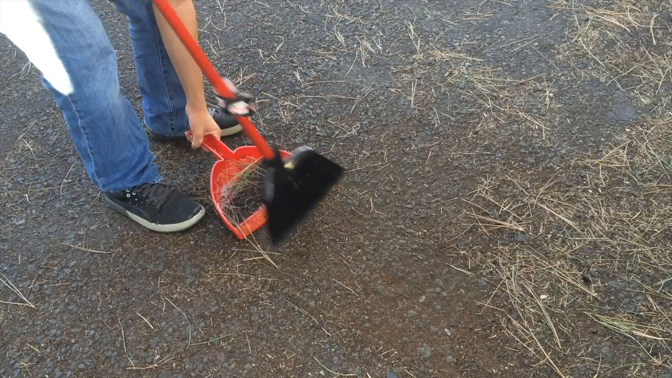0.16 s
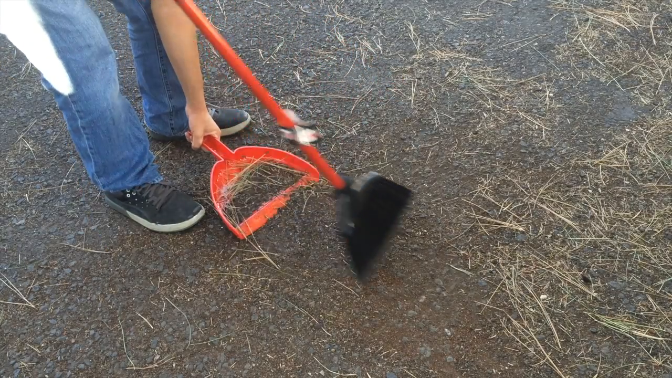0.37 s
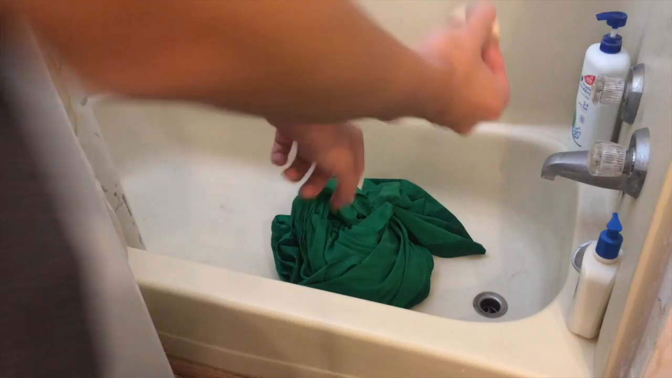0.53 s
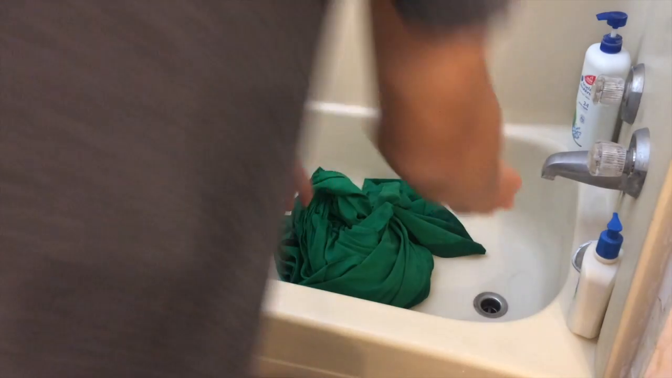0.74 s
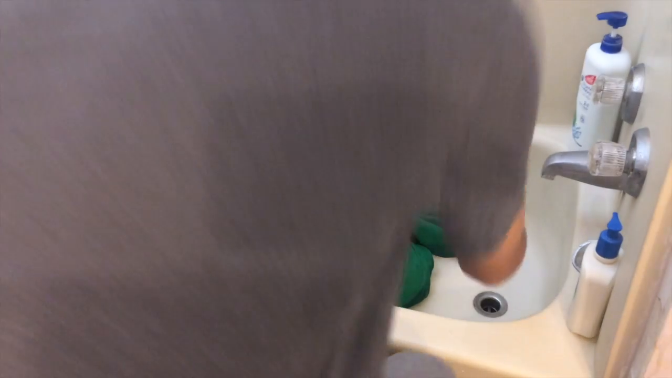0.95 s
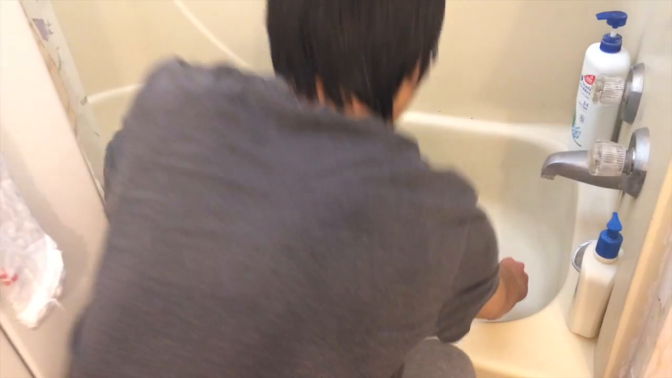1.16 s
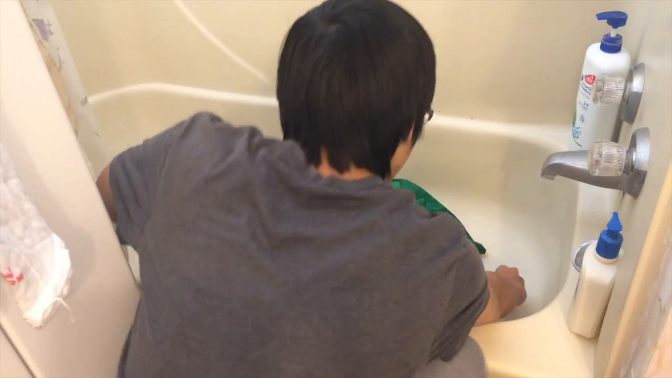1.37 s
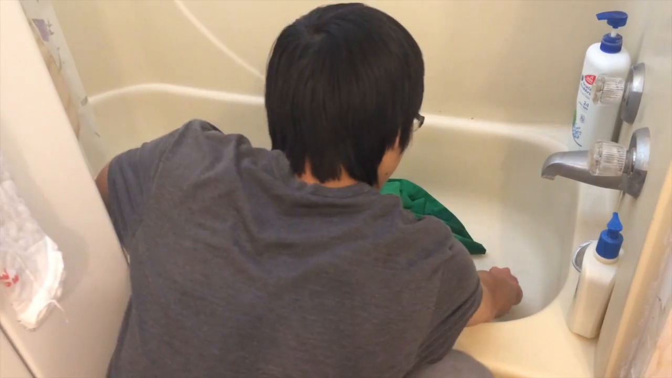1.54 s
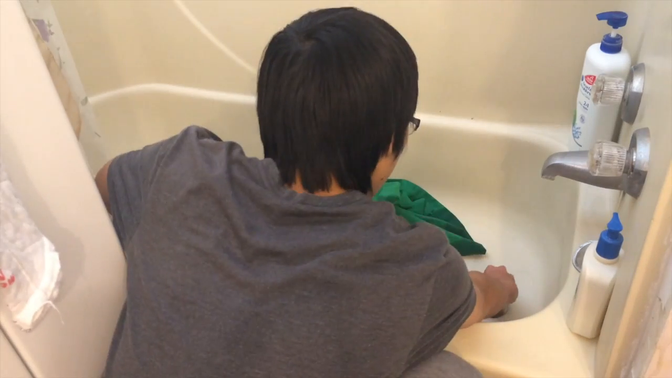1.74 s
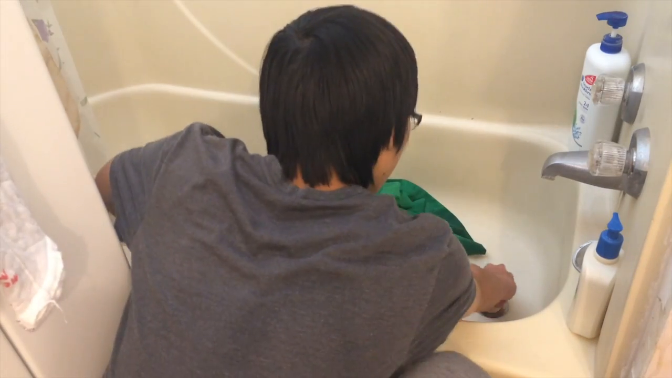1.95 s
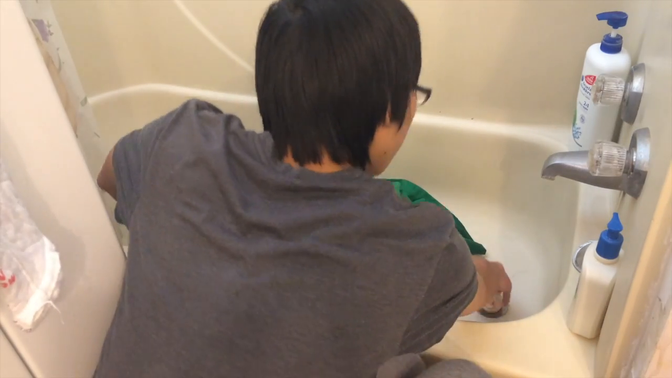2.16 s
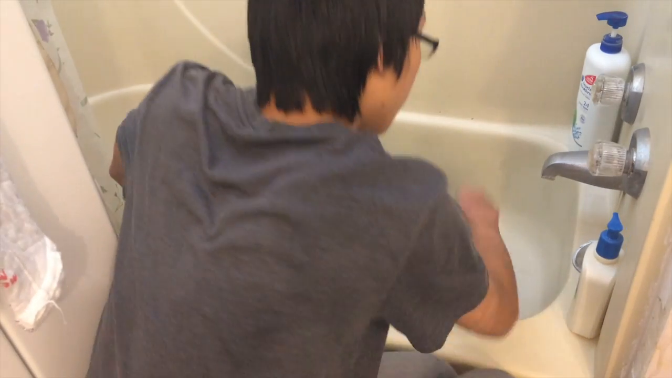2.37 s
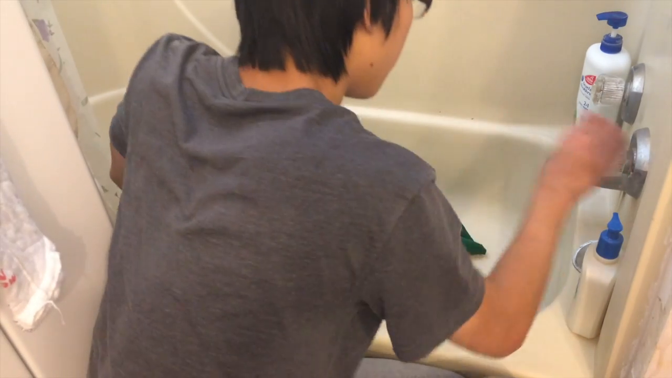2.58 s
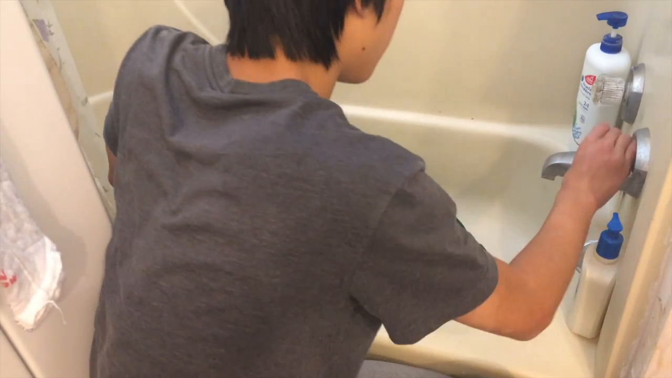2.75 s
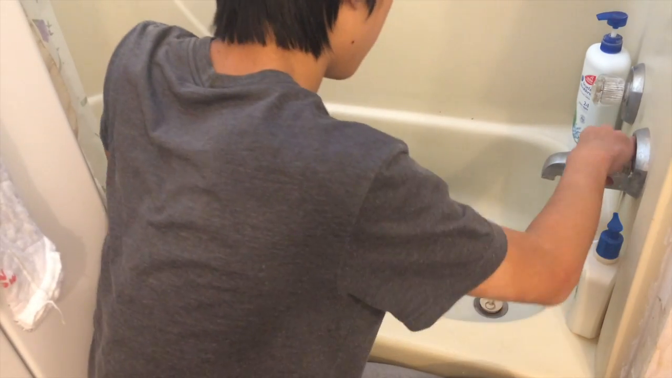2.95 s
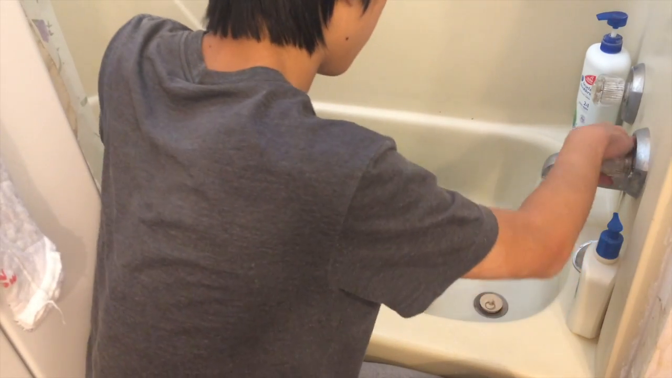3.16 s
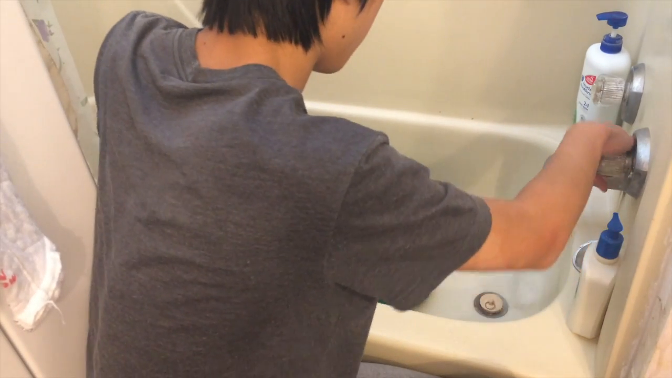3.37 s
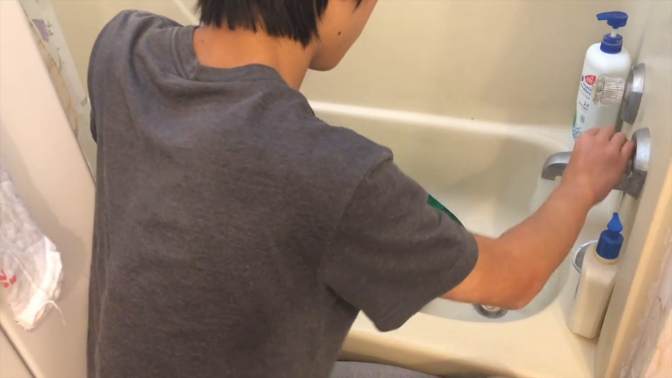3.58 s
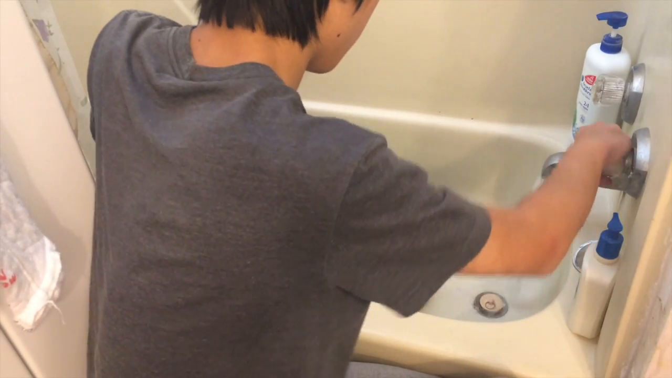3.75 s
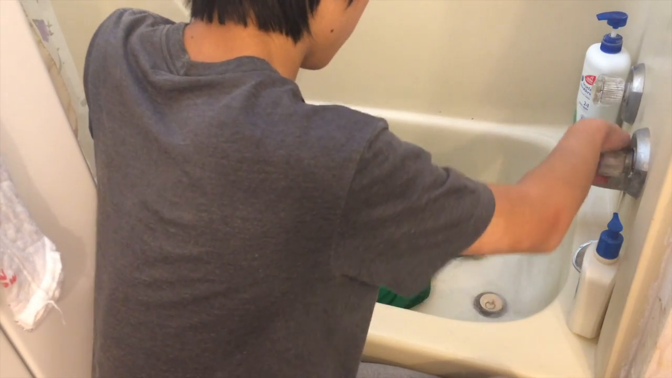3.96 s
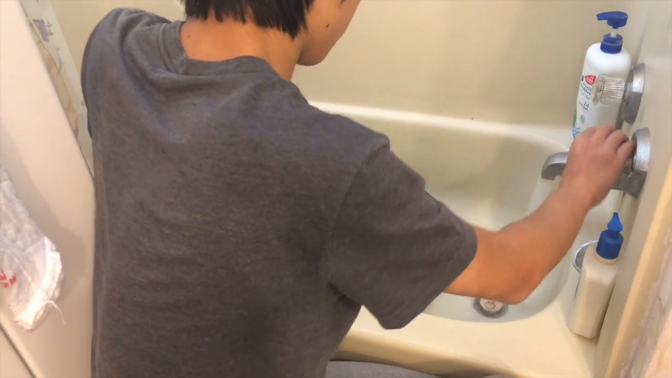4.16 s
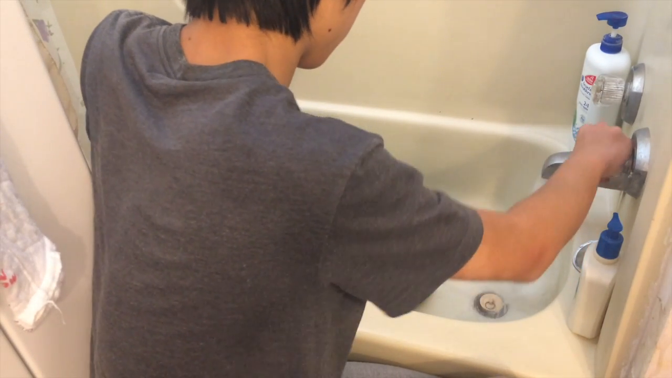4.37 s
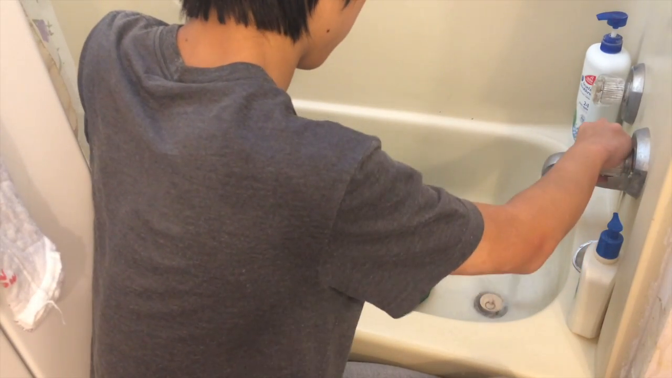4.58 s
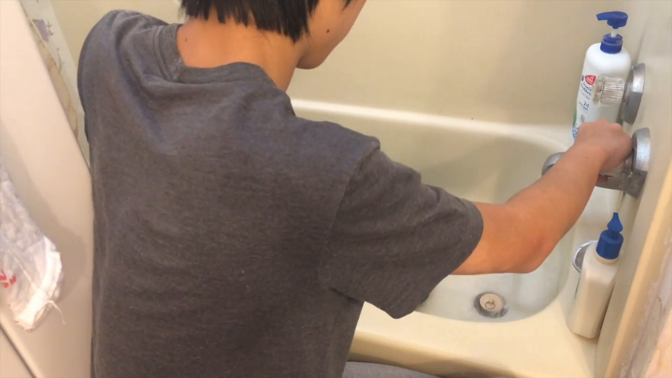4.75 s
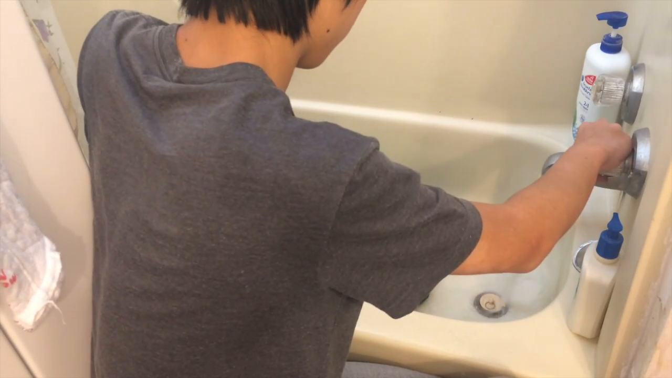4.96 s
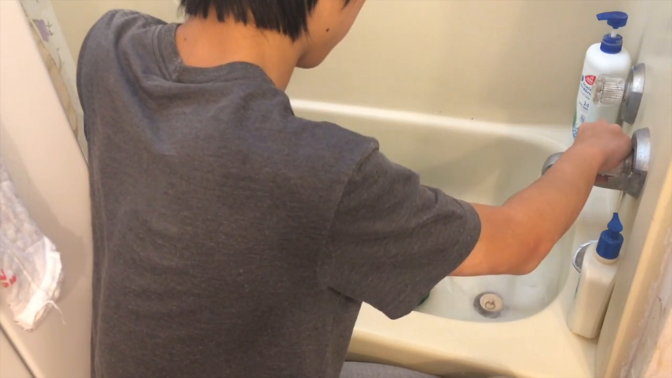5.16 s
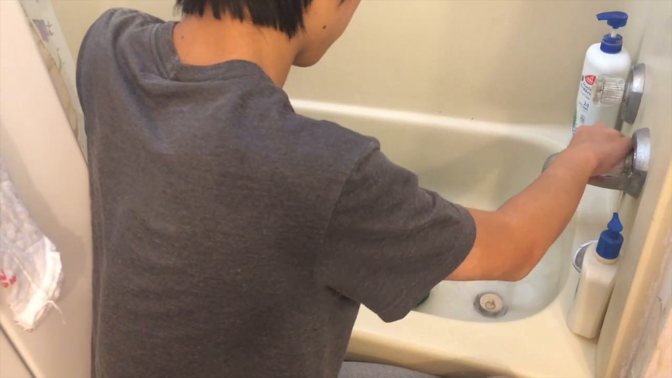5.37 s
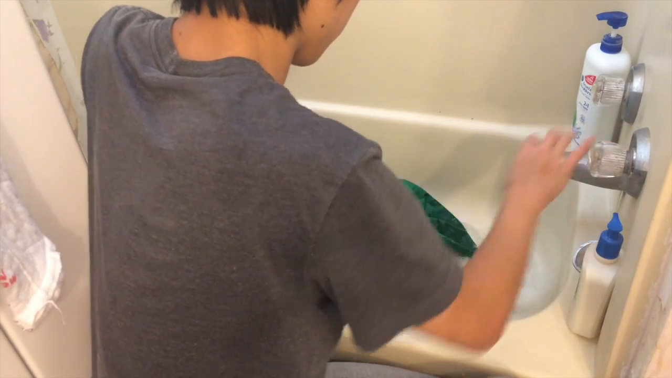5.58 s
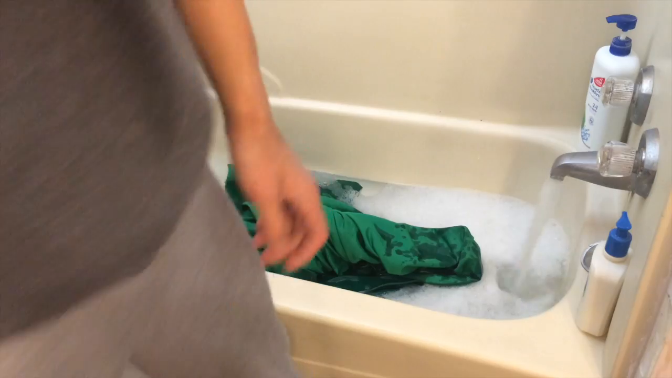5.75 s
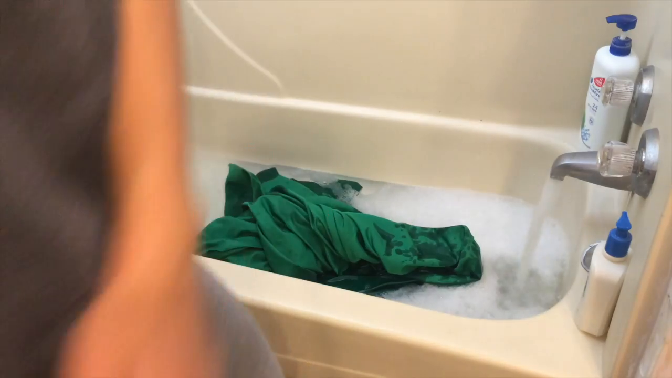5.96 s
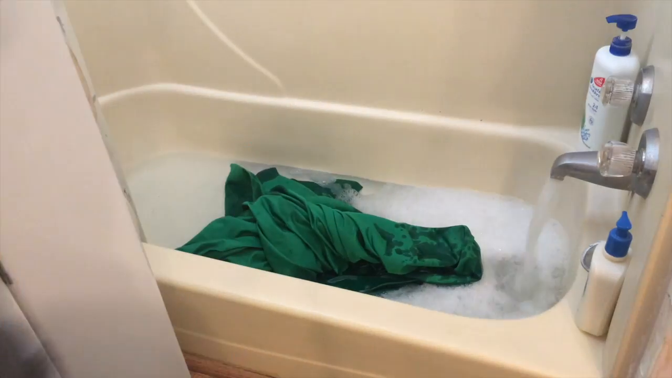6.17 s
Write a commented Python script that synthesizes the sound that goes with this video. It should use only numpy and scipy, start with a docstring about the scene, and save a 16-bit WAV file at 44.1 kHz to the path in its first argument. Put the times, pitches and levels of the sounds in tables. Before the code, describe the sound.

After a quick sweep into a dustpan, clothes rustle, a drain plug clacks, and a bath faucet opens with a whine and runs.

```python
"""A yard, traffic far off: a broom scrapes grit into a dustpan. Then, abruptly, a small bathroom.
Someone leans into the tub, bumps its shell, seats the drain plug with a clack and opens the faucet.
The valve hisses and whines while half open, the spout gulps, and the jet splashes and drums on the tub.
After another abrupt change the jet runs softly into foam. One microphone, mono throughout."""
import sys
import numpy as np
from scipy import signal
from scipy.fft import rfft, irfft
from scipy.io import wavfile
from scipy.ndimage import uniform_filter1d

SR = 44100
rng = np.random.default_rng(int(sys.argv[2]) if len(sys.argv) > 2 else 0)


def inscribe(sig):
    """Save sig as 16-bit PCM at rate SR to the path in sys.argv[1].

    A 1-D sig is mono; a 2-D sig holds one channel per row.
    Samples are clipped to [-1, 1] before scaling.
    """
    pcm = np.round(np.clip(np.atleast_2d(sig).T, -1, 1) * 32767)
    wavfile.write(sys.argv[1], SR, pcm.astype(np.int16))


N = 274302
T = np.arange(N) / SR

# Distant traffic, heard from the yard. Each row: frequency in Hz, level in dB.
TRAFFIC_SPECTRUM = [(18, -48), (30, -22), (105, -1), (228, -19), (328, -15.5), (364, -24), (426, -17),
                    (497, -21), (978, -22), (1560, -30.5), (2370, -42), (2920, -43), (3150, -42),
                    (15000, -54)]
# Bristles on asphalt. Each row: frequency in Hz, level in dB.
BRISTLE_SPECTRUM = [(300, 1), (1500, 3.5), (3500, -6), (7000, -11), (14000, -27)]
# Pushes of the broom. Each row: peak time in seconds, level in dB, rise and decay in seconds.
BROOM_STROKES = [(.03, -52.5, 0.055, 0.073), (.11, -53.5, .04, .02), (.195, -57, .015, 0.014)]
# Grit and broom head on the pan. Each row: start in seconds, level in dB, pitch in Hz, decay in seconds.
DUSTPAN_TICKS = [(.01, -51, 7000, 0.0022), (.031, -36.5, 1430, 0.0063), (.033, -43, 5960, 0.0054),
                 (.065, -50, 3400, .002), (.083, -40.5, 3550, 0.0022), (.112, -49, 3000, .002),
                 (.185, -41, 2030, 0.0036), (.186, -48, 7650, .002)]
# Bathroom room tone. Each row: frequency in Hz, level in dB.
ROOM_SPECTRUM = [(15, -35), (25, -12), (54, -0.5), (95, -7.5), (128, -2), (250, -6.5), (655, -16.5),
                 (769, -16.5), (1060, -21.5), (1310, -19.5), (1960, -24.5), (2930, -25), (15000, -37)]
# Rustling clothes. Each row: frequency in Hz, level in dB.
CLOTH_SPECTRUM = [(150, 4), (450, 5.5), (900, 0), (1300, 0), (2200, -6), (3500, -13), (6000, -15),
                  (8000, -18), (11000, -27.5), (15000, -35)]
# Moves of the body. Each row: peak time in seconds, level in dB, rise and decay in seconds.
BODY_MOVES = [(.487, -48.5, .01, 0.13), (.63, -55.5, 0.078, 0.08), (1.06, -58, 0.21, 0.27),
              (1.46, -55, .03, 0.21), (1.67, -52, .015, 0.1), (2.76, -59, 0.35, 0.33)]
# Hands and knees on the tub. Each row: start in seconds, level in dB, pitch in Hz, decay in seconds,
# scuff level in dB relative to the bump.
TUB_BUMPS = [(1.008, -35.5, 51.6, 0.04, -4), (1.192, -41, 176, 0.012, -23), (1.246, -45.5, 183, 0.033, -26),
             (1.42, -32.5, 354, 0.025, -12.5), (1.46, -32.5, 153.5, 0.037, -27),
             (1.514, -35.5, 74.4, 0.02, -3), (1.642, -32.5, 300, 0.014, -11),
             (1.656, -28, 221.6, 0.027, -19), (1.68, -32.5, 185, 0.042, -14),
             (1.756, -36.5, 185, 0.041, -32), (2.227, -46.5, 189, 0.01, -6),
             (2.722, -39.5, 160.5, 0.046, -30), (2.74, -39, 422, 0.021, -5)]
# The plug drops into its seat. Each row: start in seconds, level in dB.
PLUG_CLACKS = [(1.5171, -10.8), (1.532, -23)]
# The plug's ring. Each row: frequency in Hz, level in dB, seconds to fall 60 dB.
PLUG_MODES = [(810, -6, 0.099), (1094, -22, 0.081), (1260, -9, 0.063), (1437, 3, 0.17), (1580, 1, 0.069),
              (1820, -3, 0.1), (2050, -2, 0.06), (2500, -12, .06), (3000, -20, 0.063), (3540, -6, 0.043)]
# The clack thrown back by the tub walls. Each row: frequency in Hz, level in dB.
CLACK_ECHO_SPECTRUM = [(200, -16), (600, -16), (800, -11), (1400, 0), (2000, 0.5), (2800, -22), (3500, -23),
                       (4500, -26), (6000, -41), (9000, -49), (15000, -69)]
# The jet through the half-open valve. Each row: frequency in Hz, level in dB.
HISS_SPECTRUM = [(250, -1.5), (450, 4.5), (700, 7.5), (950, 4.5), (1200, 1.5), (1700, 0), (2200, -1.5),
                 (3500, -6), (4800, -1.5), (6500, 3), (8000, 0.5), (9500, -4.5), (13000, -12), (15000, -19)]
# The hollow spout's resonances. Each row: frequency in Hz, width in Hz, level in dB.
SPOUT_MODES = [(2425, 80, 0.5), (3000, 120, 1.5), (3350, 160, 0.5), (3690, 110, 0.5), (4140, 64, 2.5),
               (4650, 79, -9), (5080, 170, -11), (5950, 120, 1), (6410, 49, 0), (6620, 12, 4),
               (7210, 110, 0), (7610, 80, 3), (7600, 57, -8), (7830, 120, 2), (8570, 93, 0)]
# The pipe's resonances. Each row: frequency in Hz, width in Hz, level in dB.
PIPE_MODES = [(1104, 11, -16.5), (1275, 21, -33), (1610, 20, -12), (1732, 45, -5.5), (1830, 27, -15),
              (1937, 16, -10.5)]
# The whine flares up. Each row: peak time in seconds, level in dB, pitch in Hz, length in seconds.
WHINE_FLARES = [(3.075, -28.5, 1434, .05), (3.285, -20, 1420, .022), (3.414, -15.5, 1437, .014),
                (3.478, -18, 1474, .018), (3.522, -18, 1557, 0.015), (3.684, -14.5, 1450, .011),
                (3.697, -15, 1488, .018), (3.753, -13.5, 1530, 0.017)]
# The tub shell's resonances. Each row: frequency in Hz, width in Hz, level in dB.
TUB_MODES = [(69.4, 25, -18), (101.5, 6.3, -10), (162, 19, -1), (185, 31, -1.5), (310.7, 11.7, -2),
             (438, 28, -2.5), (449, 22, -11), (674, 21, -1.5), (975, 32, -6), (1930, 14, -3.5),
             (2303, 30, -3.5)]
# Air in the filling spout. Each row: start in seconds, level in dB, pitch in Hz, fall in Hz per second,
# rise and decay in seconds.
SPOUT_GULPS = [(2.963, -18.5, 567, 900, 0.0023, 0.0033), (2.975, -36.5, 593, 1504, 0.0041, 0.067),
               (3.045, -25.5, 482.6, 250, .0091, 0.034), (3.067, -33, 327, 100.6, .0071, 0.022),
               (3.199, -34.5, 458.4, 100, 0.014, 0.044), (3.679, -33, 458, 100, .0075, 0.021)]
# The jet on the bare tub. Each row: frequency in Hz, level in dB.
SPLASH_SPECTRUM = [(30, -36), (60, -13), (100, -2.5), (125, -8), (165, 5.5), (265, -17), (330, -7),
                   (600, -4), (850, -8), (1200, -7), (1600, -2), (3000, -4.5), (4400, -5.5), (6300, -5.5),
                   (8000, -8.5), (10000, -14.5), (13000, -19), (15000, -27)]
# Larger splashes in the new pool. Each row: start in seconds, level in dB, pitch in Hz, decay in seconds.
POOL_SLAPS = [(3.325, -27.5, 2530, 0.015), (3.752, -26.5, 2880, 0.033), (3.805, -25.5, 2200, 0.011),
              (3.903, -28.5, 1940, 0.022), (3.951, -26, 2434, 0.0076), (4.033, -23, 2200, 0.01),
              (4.122, -23.5, 2470, 0.021), (4.325, -26.5, 1910, 0.014), (4.608, -27.5, 1930, 0.0087),
              (4.89, -29, 1730, 0.013), (5.7, -27, 1900, 0.0073)]
# The jet spurts. Each row: peak time in seconds, level in dB, rise and decay in seconds.
JET_SPURTS = [(3.965, -31.5, 0.022, 0.039), (4.055, -34, 0.02, 0.12)]
# The jet running into suds. Each row: frequency in Hz, level in dB.
FOAM_SPECTRUM = [(30, -19), (70, -8), (105, 8), (128, -3), (180, 9), (260, -5), (700, -6), (1150, -11),
                 (1400, -2.5), (1700, -4), (2100, -10), (4500, -15.5), (8000, -21.5), (12000, -28),
                 (15000, -40)]
# Spatters on the foam. Each row: start in seconds, level in dB, pitch in Hz, decay in seconds.
FOAM_SPATTERS = [(5.885, -44, 4500, 0.02), (5.968, -59, 7500, .002), (6.0, -44, 3480, 0.055),
                 (6.037, -44, 5500, .018), (6.111, -44, 7470, .002), (6.203, -49, 7500, 0.0043)]

INDOORS_S, FOAM_S = 0.491, 5.787  # the two changes of scene
FLOW_START_S, FLOW_RISE_S, JET_LANDS_S, WIDE_OPEN_S = 2.886, 0.044, 3.312, 3.715
FAINT_START_S, WHINE_START_S, WHINE_END_S = 2.87, 2.99, 3.71  # at the end the gap is too wide to whistle
WHINE_DB, WHINE_GROWTH_DB_PER_S, WHINE_FALL_DB_PER_S = -30.5, 10.5, 145
WHINE_HZ, SAG_HZ_PER_S, CLIMB_HZ_PER_S = 1396, 1150, 168
HISS_DB, SPLASH_DB, DRUM_DB, DRIBBLE_DB, FOAM_DB = -34, -34, -43, -51, -48
TREBLE_LIMIT_HZ = 15300


def amp(db):
    """Decibels to gain."""
    return 10 ** (np.asarray(db) / 20)


def unit(x):
    """Scaled to rms 1."""
    return x / np.sqrt(np.mean(x ** 2) + 1e-20)


def peaked(x):
    """Scaled to peak 1."""
    return x / abs(x).max()


def add(mix, start, sound):
    """Mixes a sound in at start seconds."""
    part = mix[max(round(start * SR), 0):][:len(sound)]
    part += sound[:len(part)]


def colour(x, points):
    """Shapes x by a spectrum of (Hz, dB) points, at rms 1."""
    hz, db = np.transpose(points)
    f = np.fft.rfftfreq(len(x), 1 / SR) + 1
    gain = amp(np.interp(np.log(f), np.log(hz), db)) * np.minimum(f / hz[0], 1) ** 2
    return unit(irfft(rfft(x) * gain, len(x)))


def noise(size=N):
    """White noise."""
    return rng.standard_normal(size)


def wander(rate):
    """Random drift of rms 1, up to about rate changes a second."""
    return unit(irfft(rfft(noise()) * np.exp(-(np.fft.rfftfreq(N, 1 / SR) / rate) ** 2), N))


def envelope(start, rise, end=np.inf, fall_db_per_s=0):
    """Rises towards 1 from start, then falls after end."""
    attack = (1 - np.exp(-np.maximum(T - start, 0) / rise)) ** 2
    return attack * amp(-fall_db_per_s * np.maximum(T - end, 0))


def swells(rows):
    """Gain of overlapping gestures, each rising to its peak and dying away."""
    return np.sqrt(sum((amp(db) * np.exp(-np.maximum((peak - T) / rise, (T - peak) / decay))) ** 2
                       for peak, db, rise, decay in rows))


def resonate(x, hz, width):
    """A steady or moving resonance of gain 1."""
    turn = np.exp(2j * np.pi * np.cumsum(hz * np.ones(len(x))) / SR)
    pole = np.exp(-np.pi * width / SR)
    return 2 * (turn * signal.lfilter([1 - pole], [1, -pole], x / turn + 1e-18)).real


def ring_modes(drive, modes, skirt):
    """Rings each mode with a fresh drive(); a second resonance, skirt times wider, trims its sides."""
    return sum(amp(db) * unit(resonate(resonate(drive(), hz, width), hz, skirt * width))
               for hz, width, db in modes)


def band(x, hz, spread):
    """Band-pass from hz / spread to hz * spread."""
    edges = [hz / spread, min(hz * spread, SR / 2 - 1)]
    return signal.sosfilt(signal.butter(2, edges, "band", fs=SR, output="sos"), x)


def patchy(x, depth_db):
    """Lets patches of the spectrum swell and fade independently."""
    spectra = signal.stft(x, nperseg=512)[2]
    patches = uniform_filter1d(noise(spectra.shape), size=12, axis=0)
    patches = unit(uniform_filter1d(patches, size=8, axis=1))
    return signal.istft(spectra * amp(depth_db * patches), nperseg=512)[1][:N]


def room(x, wet_db, t60):
    """The direct sound at the microphone, plus dense reflections from close, hard walls."""
    t = T[:SR // 2]
    taps = noise(len(t)) * (rng.random(len(t)) < .15) * (t > .002) * amp(-60 * t / t60)
    return x + amp(wet_db) * signal.oaconvolve(x, taps / np.linalg.norm(taps))[:N]


def burst(hz, decay, spread):
    """A dying burst of noise around one frequency."""
    t = T[:SR // 3]
    return peaked(band(noise(len(t)) * np.exp(-t / decay), hz, spread))


def ticks(rows, spread):
    """One short burst for each row."""
    out = np.zeros(N)
    for start, db, hz, decay in rows:
        add(out, start, amp(db) * burst(hz, decay, spread))
    return out


def drops(per_s, spread_db):
    """Random impacts, most small and a few large."""
    return noise() * (rng.random(N) < per_s / SR) * amp(spread_db * np.minimum(rng.exponential(1, N), 4))


def bubbles(per_s, low_hz, high_hz, cycles, count=30):
    """Trapped bubbles ring for some cycles, rising in pitch as they surface."""
    out, t = np.zeros(N), T[:SR // 12]
    for hz in np.geomspace(low_hz, high_hz, count):
        age = t * hz / cycles
        ring = np.exp(-age) * np.sin(2 * np.pi * hz * t * (1 + 0.0273 * age))
        births = (rng.random(N) < per_s / count / SR) * rng.uniform(-0.93, 1, N) ** 3
        out += signal.oaconvolve(births, ring)[:N] * np.sqrt(hz)
    return unit(out)


def traffic():
    """Traffic rumbles far from the microphone."""
    return amp(-49) * colour(noise(), TRAFFIC_SPECTRUM)


def broom():
    """In the open air, bristles scrape asphalt and push ticking grit into the pan."""
    sweep = swells(BROOM_STROKES) * colour(drops(2500, 3.3), BRISTLE_SPECTRUM)
    return sweep + ticks(DUSTPAN_TICKS, spread=1.32)


def room_tone():
    """The bathroom's faint, low background."""
    return amp(-59) * colour(noise(), ROOM_SPECTRUM)


def leaning_in():
    """Cloth rustles and soft bumps set the tub shell thudding; their scuffs echo off the near walls."""
    thuds, scuffs, t = np.zeros(N), np.zeros(N), T[:SR // 3]
    for start, db, hz, decay, scuff_db in TUB_BUMPS:
        thud = peaked(np.sin(2 * np.pi * hz * t) * (1 - np.exp(-t / 0.0011)) * np.exp(-t / decay))
        add(thuds, start, amp(db) * (0.47 * thud + 0.68 * burst(hz, decay, spread=1.55)))
        scuff = peaked(colour(noise(len(t)), CLOTH_SPECTRUM) * np.exp(-t / 0.018))
        add(scuffs, start, amp(db + scuff_db) * scuff)
    cloth = swells(BODY_MOVES) * colour(drops(20000, 0.59), CLOTH_SPECTRUM)
    return thuds + room(scuffs, wet_db=-4.5, t60=0.18) + cloth


def drain_plug():
    """A sharp contact pulse, then the plug's ring and the tub's dense reflections."""
    out, t = np.zeros(N), T[:SR // 3]
    pulse = band(1. * (t == 0), hz=1460, spread=1.9)
    contact = peaked(signal.sosfilt(signal.butter(2, [1100, 2200], "band", fs=SR, output="sos"), pulse))
    ring = peaked(sum(amp(db - 60 * t / t60) * np.sin(2 * np.pi * (hz * t + rng.random()))
                      for hz, db, t60 in PLUG_MODES))
    for start, db in PLUG_CLACKS:
        reflections = colour(noise(len(t)), CLACK_ECHO_SPECTRUM) * amp(-60 * t / 0.14)
        tail = (amp(-10.5) * reflections + amp(-11.5) * ring) * (1 - np.exp(-t / 0.00062))
        add(out, start, amp(db) * (contact + tail))
    return out


def valve():
    """The valve cracks open with a tick and hisses through the hollow spout until it is wide open."""
    hollow = unit(ring_modes(noise, SPOUT_MODES, skirt=3))
    jet = amp(-2) * patchy(colour(noise(), HISS_SPECTRUM), depth_db=2.5) + amp(-5) * hollow
    tick = room(ticks([(2.865, -48, 1440, 0.015)], spread=1.05), wet_db=-9, t60=.2)
    hissing = amp(HISS_DB) * envelope(FLOW_START_S, FLOW_RISE_S, WIDE_OPEN_S, fall_db_per_s=108)
    return tick + hissing * jet * amp(.6 * wander(35))


def whine():
    """The narrow gap whistles unsteadily, louder and higher as it opens, and the pipe sings along."""
    age = T - WHINE_START_S
    fill_left_s = np.clip(-age, 0, WHINE_START_S - FAINT_START_S)
    turned_s = np.clip(age, 0, WHINE_END_S - WHINE_START_S)
    # The pitch sags as the spout fills, then climbs as the handle turns.
    hz = WHINE_HZ + SAG_HZ_PER_S * fill_left_s + CLIMB_HZ_PER_S * turned_s
    whistle = unit(resonate(resonate(noise(), hz, width=105), hz, width=160))
    whistle = unit(whistle / np.sqrt(1 + 0.057 * abs(signal.hilbert(whistle)) ** 2))  # it saturates
    pipe = ring_modes(noise, PIPE_MODES, skirt=4)
    pipe_db = -8 + 2.5 * np.exp(-((T - 3.56) / .08) ** 2)  # the gap passes the width that suits the pipe
    faint = amp(-40) * envelope(FAINT_START_S, 0.034, WHINE_END_S, WHINE_FALL_DB_PER_S)
    strong = amp(WHINE_DB + WHINE_GROWTH_DB_PER_S * turned_s)
    strong *= envelope(WHINE_START_S, 0.033, WHINE_END_S, WHINE_FALL_DB_PER_S)
    out = np.hypot(faint, strong) * (amp(-1.5) * whistle + amp(pipe_db) * pipe)
    for peak, db, flare_hz, length in WHINE_FLARES:
        t = np.arange(0, length, 1 / SR)
        add(out, peak - length / 2, amp(db) * np.hanning(len(t)) * np.sin(2 * np.pi * flare_hz * t))
    return out


def tub_shell():
    """The lumpy jet keeps the tub's modes ringing."""
    return unit(ring_modes(lambda: drops(900, 1.55), TUB_MODES, skirt=5))


def tub_drumming():
    """The tub drums under a dribble, then the jet; air dragged under glugs as the pool deepens."""
    dribble = amp(DRIBBLE_DB) * envelope(FLOW_START_S, FLOW_RISE_S)
    jet = amp(DRUM_DB + 1.2 * wander(8.9)) * envelope(JET_LANDS_S, rise=0.022)
    glugs = amp(-7.5) * envelope(WIDE_OPEN_S, rise=0.19) * bubbles(90, 60, 593, cycles=4.2)
    return np.hypot(jet, dribble) * (tub_shell() + glugs)


def spout():
    """Pockets of air flutter and ring with falling pitch as water drives them out."""
    out, t = np.zeros(N), T[:SR // 3]
    for start, db, hz, fall, rise, decay in SPOUT_GULPS:
        swell = peaked((1 - np.exp(-t / rise)) ** 2 * np.exp(-t / decay))
        add(out, start, amp(db - 2) * swell * np.sin(2 * np.pi * (hz - fall * t / 2) * t))
    return room(out * (1 + 0.3 * wander(200)), wet_db=-3.5, t60=0.31)


def splash():
    """Drops, fine spray and bubbles where the jet hits the tub."""
    impacts = unit(room(colour(drops(1800, 1.6), SPLASH_SPECTRUM), wet_db=4, t60=0.28))
    spray = colour(noise(), SPLASH_SPECTRUM)
    gurgle = unit(room(bubbles(520, 1252, 4560, cycles=11), wet_db=1.5, t60=.12))
    water = patchy(unit(impacts + amp(-1.5) * spray + amp(-6.5) * gurgle), depth_db=1)
    slaps = room(ticks(POOL_SLAPS, spread=1.265), wet_db=0, t60=0.085)
    falter_db = -2 * np.exp(-((T - 3.86) / .035) ** 2)  # the jet falters as the valve comes wide open
    flow = amp(SPLASH_DB + falter_db) * envelope(JET_LANDS_S, rise=0.011)
    return np.hypot(flow, swells(JET_SPURTS)) * water * amp(.5 * wander(50)) + slaps


def full_flow_ring():
    """At full flow a faint, wavering ring near the whine's pitch builds slowly."""
    singing = amp(-40.5 + 2 * wander(6.6)) * envelope(WIDE_OPEN_S, rise=0.56, end=5.55, fall_db_per_s=64)
    return singing * unit(resonate(resonate(noise(), hz=1530, width=79), hz=1420, width=220))


def foam():
    """Deeper water and suds muffle the jet; stray droplets fizz on top."""
    water = patchy(colour(drops(5500, 0.73), FOAM_SPECTRUM), depth_db=1.5)
    water += amp(-16) * bubbles(200, 428, 2440, cycles=11)
    fizz = unit(room(band(drops(120, 2.9), hz=6000, spread=1.5), wet_db=7, t60=0.19))
    spatters = ticks(FOAM_SPATTERS, spread=1.54)
    return amp(FOAM_DB) * water + amp(-55.5) * tub_shell() + amp(-70) * fizz + spatters


def scene():
    """Yard, bare tub and foamy tub in turn, joined by 3 ms crossfades; one microphone on both channels."""
    indoors, foamy = (np.clip((T - change) / .003 + .5, 0, 1) for change in (INDOORS_S, FOAM_S))
    faucet = valve() + whine() + tub_drumming() + spout() + splash() + full_flow_ring()
    bathroom = room_tone() + leaning_in() + drain_plug() + faucet
    yard = traffic() + broom()
    mono = (1 - indoors) * yard + (indoors - foamy) * bathroom + foamy * foam()
    return np.array([mono, mono])


def record(dry):
    """A steep low-pass takes the top treble off the microphone's signal."""
    lowpass = signal.firwin(801, TREBLE_LIMIT_HZ, window=("kaiser", 9), fs=SR)
    return signal.oaconvolve(dry, lowpass[None], "same")


dry = scene()
out = record(dry)
inscribe(out)
```